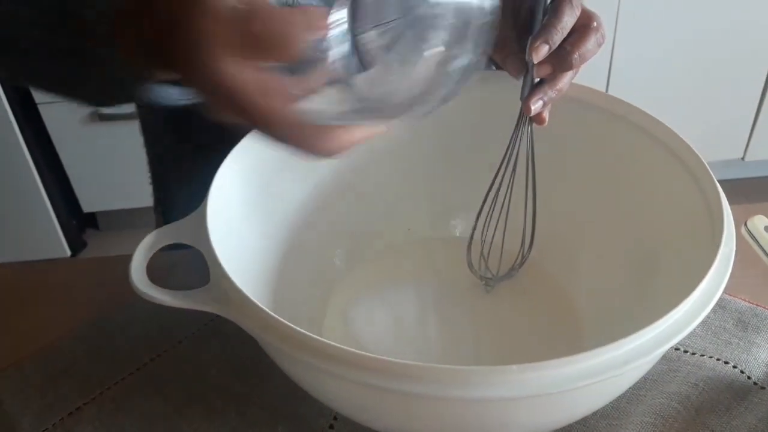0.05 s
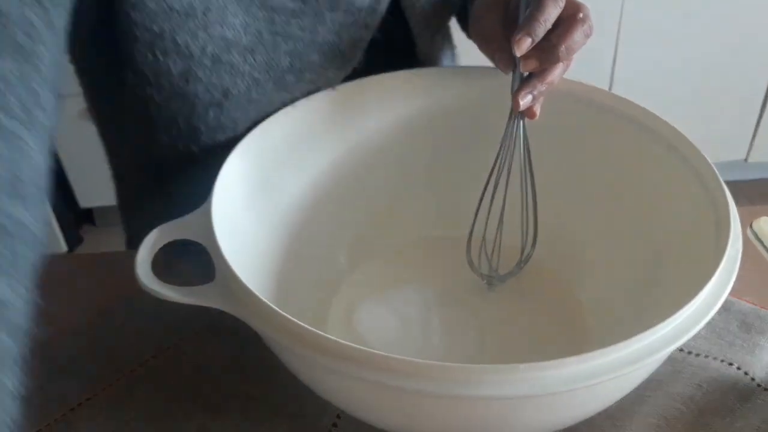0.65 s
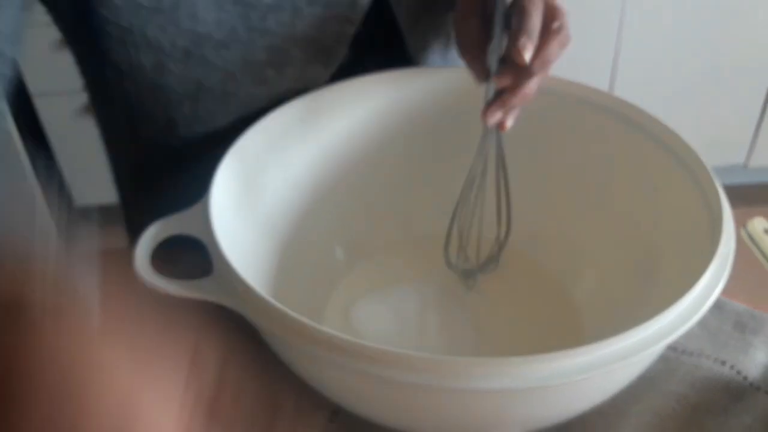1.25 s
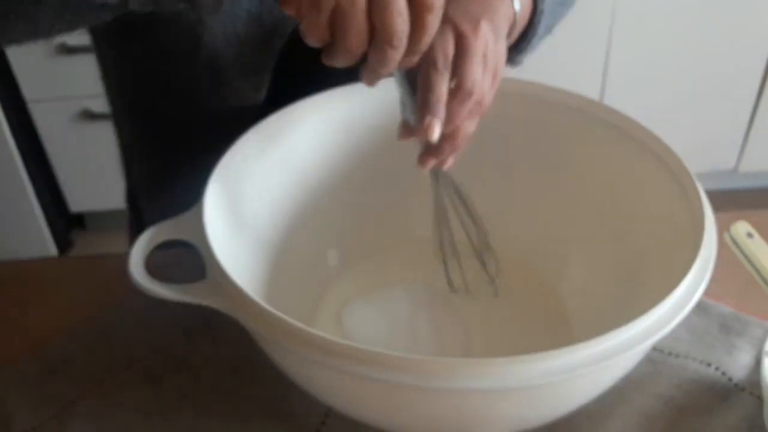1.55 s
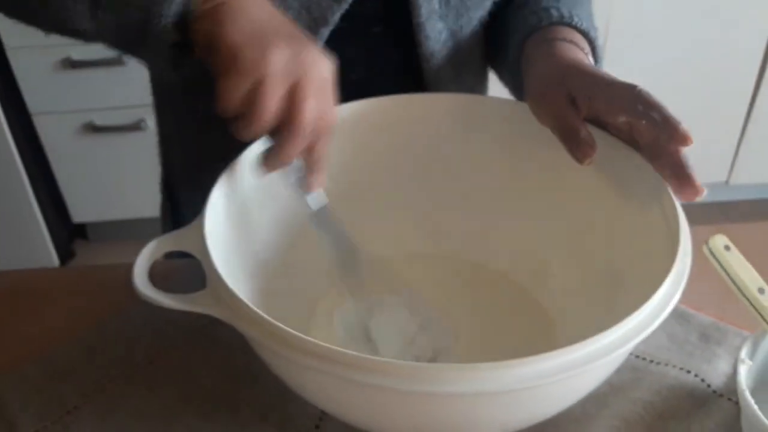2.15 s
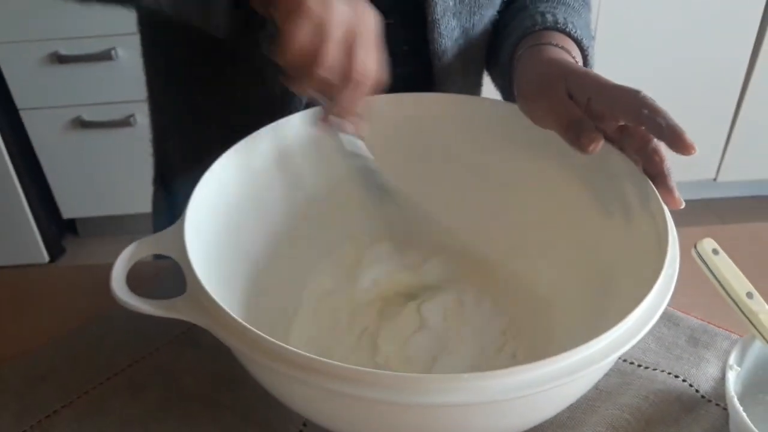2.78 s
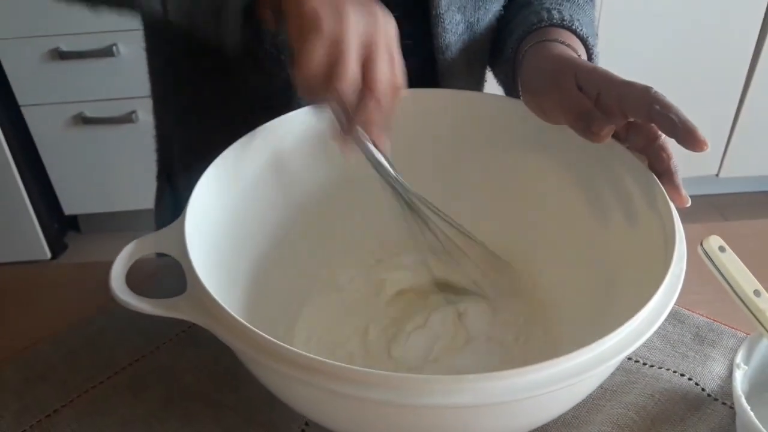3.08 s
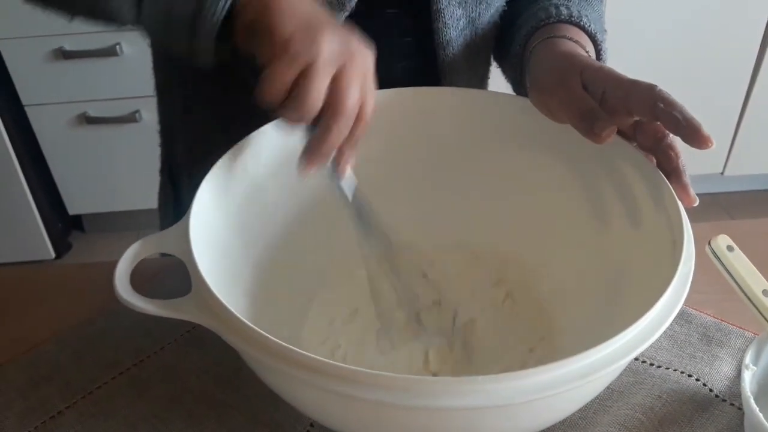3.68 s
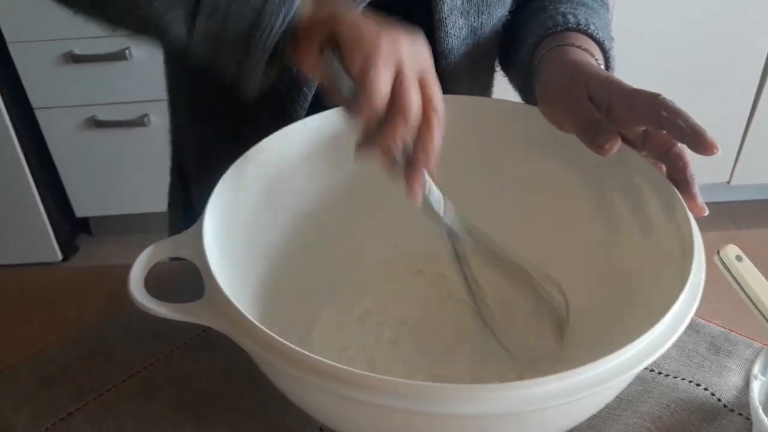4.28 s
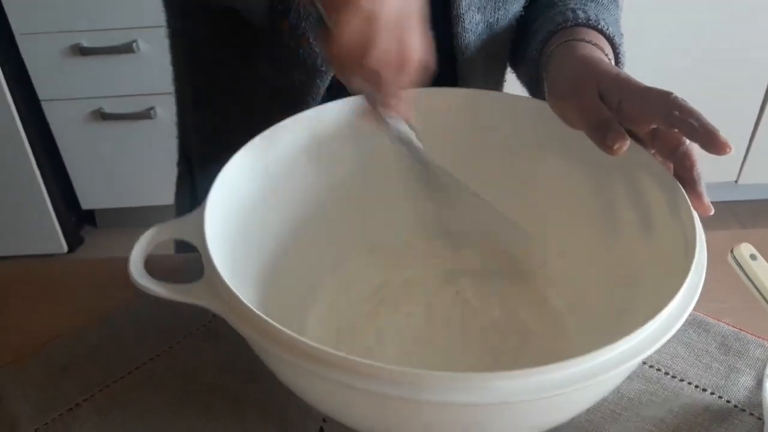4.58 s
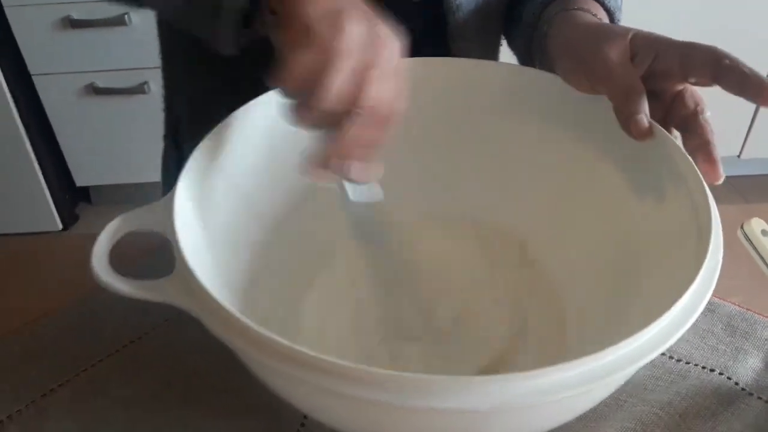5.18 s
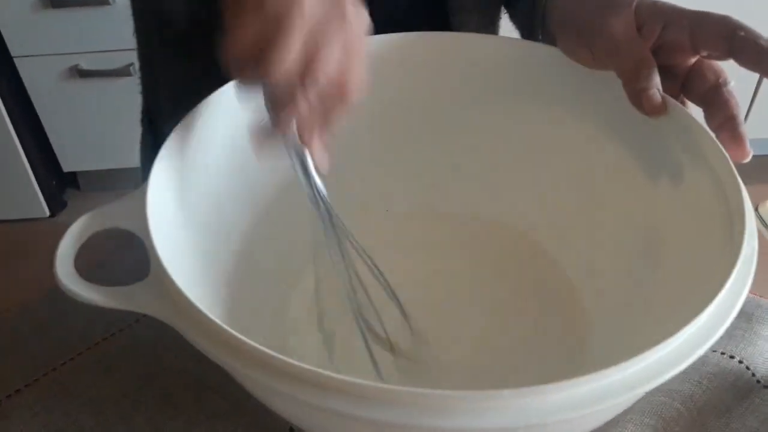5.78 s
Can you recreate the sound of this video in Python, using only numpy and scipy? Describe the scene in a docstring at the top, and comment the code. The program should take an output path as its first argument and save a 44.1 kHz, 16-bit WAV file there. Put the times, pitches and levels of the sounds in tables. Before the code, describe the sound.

Close to the microphone, a wire whisk beats runny batter in a large plastic bowl. Before it starts there is low kitchen hush, two quick dull knocks on a table, a faint rustle of wool and several small taps of the whisk. Then comes rapid, scratchy rattling with sharp irregular clacks, a soft wet slosh and the low drumming of the bowl on the table, lightly echoed by the room.

```python
"""A light tap sounds in a hushed kitchen, then a dull double knock as something is set on the table.
A sleeve brushes past, and a wire whisk taps a big plastic bowl as it changes hands.
Then the whisk beats thin batter, about eight strokes a second: the wires chatter and slap on the wall,
the plastic rings briefly, the bowl drums softly on the table, and the batter gurgles and fizzes."""
import sys
import numpy as np
from scipy import signal
from scipy.fft import rfft, irfft
from scipy.io import wavfile
from scipy.ndimage import uniform_filter1d

SR = 44100
rng = np.random.default_rng(int(sys.argv[2]) if len(sys.argv) > 2 else 0)


def persist_wave(psi):
    """Save psi, clipped to +-1, as 16-bit WAV."""
    counts = np.round(np.clip(psi, -1, 1) * 32767).astype(np.int16)
    wavfile.write(sys.argv[1], SR, np.atleast_2d(counts).T)


N = 266449


def from_db(db):
    """Turn decibels into a number to multiply by."""
    return 10 ** (np.asarray(db) / 20)


def rms_one(x):
    """Scale a sound to an average power of 1."""
    return x / np.sqrt(np.mean(x ** 2) + 1e-20)


def seconds():
    """The time of every sample."""
    return np.arange(N) / SR


def at_hz(points, hz):
    """Read between the rows of a table, giving every octave equal room."""
    known_hz, values = np.transpose(points)
    return np.interp(np.log(np.maximum(hz, 1)), np.log(known_hz), values)


def colour(x, spectrum, size=4096):
    """Turn each pitch up or down as a table of (pitch_hz, level_db) says."""
    gains = from_db(at_hz(spectrum, np.fft.rfftfreq(size, 1 / SR)))
    # minimum phase: the filter never rings before the sound arrives
    cepstrum = irfft(np.log(gains))
    cepstrum[1:size // 2] *= 2
    cepstrum[size // 2 + 1:] = 0
    return signal.oaconvolve(x, irfft(np.exp(rfft(cepstrum))))[:len(x)]


def low_cut(x, edge_hz):
    """Remove the deep bass, which small surfaces cannot give off."""
    return signal.sosfilt(signal.butter(4, edge_hz, "high", fs=SR, output="sos"), x)


def ring(clicks, hz, fade_s):
    """Each click starts a pure tone that drops by 60 dB in fade_s."""
    decay, turn = from_db(-60 / (fade_s * SR)), 2 * np.pi * hz / SR
    return signal.lfilter([0, np.sin(turn)], [1, -2 * decay * np.cos(turn), decay ** 2], clicks + 1e-18)


def push(length_s, size=24000):
    """One smooth push, then silence; the samples add up to 1."""
    force = np.sin(np.pi * np.minimum((np.arange(size) + .5) / max(length_s * SR, 1), 1))
    return force / force.sum()


def add(out, start_s, sound):
    """Mix a sound in at the given time."""
    start = max(round(start_s * SR), 0)
    out[start:start + len(sound)] += sound[:max(N - start, 0)]


def steady(x, span_s):
    """Even out loudness changes slower than span_s, keeping the finer grain."""
    span = int(span_s * SR)
    power = uniform_filter1d(uniform_filter1d(rms_one(x) ** 2, span), span)
    return x / np.std(x) / np.sqrt(np.abs(power) + 1e-4)


def random_clicks(per_s, spread_db):
    """Clicks at random moments with uneven strengths."""
    return (rng.random(N) < per_s / SR) * from_db(spread_db * np.clip(rng.standard_normal(N), -2, 2))


def follow(force, level_db, db_per_db):
    """A gain near level_db at an ordinary stroke: it grows with force and stops as the wires lift."""
    ordinary_force, lift_off_force = from_db(-16.5), from_db(-60)
    touching = force ** 2 / (force ** 2 + lift_off_force ** 2)
    return from_db(level_db) * (force / ordinary_force) ** db_per_db * touching


# the tone of the quiet room: pitch_hz, level_db
HUSH_SPECTRUM = [(25, -34), (70, -1), (140, 3), (440, -1.5), (800, -8), (1000, -4.5), (1600, -8.5),
                 (2600, -13), (4000, -15), (4700, -27.5), (5700, -34), (8000, -42.5), (12500, -31.5),
                 (16000, -34)]

def room_tone():
    """The steady hush of the kitchen, sinking a little."""
    level_db = -47.5 + np.interp(seconds(), [0, .9, 2], [1.2, -1.2, -2.5])
    return from_db(level_db) * rms_one(colour(rng.standard_normal(N), HUSH_SPECTRUM))


# how long the kitchen's echo takes to drop by 60 dB: pitch_hz, fade_s
ECHO_FADES = [(100, 1), (300, 0.61), (1000, 0.47), (3000, 0.39), (7000, 0.32), (15000, 0.36)]

def echoes(build_s, size=24000, bands=9):
    """The kitchen's answer to a click: a wash of echoes builds up, then the highs die before the lows."""
    t, hz = np.arange(size) / SR, np.fft.rfftfreq(size, 1 / SR)
    white, centres = rfft(rng.standard_normal(size)), np.geomspace(80, 16000, bands)
    tail = 0
    for centre, share in zip(centres, np.eye(bands)):
        band = irfft(white * at_hz(np.c_[centres, share], hz), size)
        tail = tail + band * from_db(-60 * t / at_hz(ECHO_FADES, centre))
    tail = tail * (1 - np.exp(-(t / build_s) ** 2))
    return tail / np.linalg.norm(tail)


# the tone of rubbing wool: pitch_hz, level_db
WOOL_SPECTRUM = [(800, -11), (2000, -3), (3800, 1.5), (5000, -11), (7000, -22.5), (10000, -21),
                 (16000, -27)]

def sleeve():
    """A woollen sleeve brushes past close by."""
    swell = np.exp(-((seconds() - 1.29) / .08) ** 2)
    return from_db(-49) * swell * rms_one(colour(rng.standard_normal(N), WOOL_SPECTRUM))


# blows on the table: start_s, strength_db, contact_s
TABLE_BLOWS = [(0.9482, -4, 0.001), (1.1044, -4.5, 0.0012)]
# the notes of the table top: pitch_hz, level_db, fade_s
TABLE_NOTES = [(136.2, -22, 0.43), (181, -22.5, 0.4), (253, 3.5, 0.012), (268, -14, 0.15),
               (400, -17.5, 0.24), (515, -18, 0.21), (566, -15.5, 0.25), (745, -18, 0.12),
               (987, -7.5, 0.066), (1230, -27, .05)]
# the tone of the room's boom: pitch_hz, level_db
BOOM_SPECTRUM = [(35, -62), (60, -31), (127, -14), (223, -7), (259, -0.5), (301, -10.5), (389, -2.5),
                 (649, -9), (700, -6.5), (864, -13.5), (975, -10), (2200, -43.5), (2860, -79), (4840, -120)]

def knocks():
    """A blunt blow thumps the table top, the hard faces tick, and the whole room booms after it."""
    out = np.zeros(N)
    for start_s, strength_db, contact_s in TABLE_BLOWS:
        force = push(contact_s)
        thump = sum(from_db(db) * ring(force, hz, fade_s) for hz, db, fade_s in TABLE_NOTES)
        boom = colour(echoes(build_s=.0018), BOOM_SPECTRUM)
        boom = from_db(15) * boom / np.linalg.norm(boom)
        tick = from_db(-35) * clack(1600, fade_s=.03, crack_db=5)
        add(out, start_s, from_db(strength_db) * (low_cut(thump, edge_hz=134) + boom + tick))
    return out


# light taps of the whisk: start_s, peak_db, pitch_hz, crack_db, cage_db
WHISK_TAPS = [(0.028, -28, 3860, 16, -18), (1.459, -32, 1545, -2, -12), (1.465, -38, 2280, 2, -12),
              (1.5996, -15, 1665, -4, -7), (1.744, -31.5, 3090, -4, -2), (1.78, -37, 3850, -4, -5),
              (1.806, -27.5, 1900, -17, -9)]
# the notes of the whisk's wire cage: pitch_hz, level_db, fade_s
CAGE_NOTES = [(976, -18, 0.24), (1710, -12, 0.11), (2500, 1, 0.02), (2620, -15, 0.054), (3500, -16, 0.08),
              (3830, -26, 0.12), (4630, -25, .06), (9800, -59, .04), (13750, -28, 0.01),
              (14400, -34, 0.087)]

def taps():
    """Lone taps on the bowl leave the wire cage free to ring."""
    out, touch = np.zeros(N), push(.00002)
    cage = sum(from_db(db) * ring(touch, hz, fade_s) for hz, db, fade_s in CAGE_NOTES)
    for start_s, peak_db, hz, crack_db, cage_db in WHISK_TAPS:
        sound = clack(hz, fade_s=.04, crack_db=crack_db) + from_db(cage_db) * cage
        add(out, start_s, from_db(peak_db) * sound / np.abs(sound).max())
    return out


# the low notes of the bowl standing on the table: pitch_hz, level_db, fade_s
BOWL_LOW_NOTES = [(84, 0.5, 0.14), (135.7, 2, 1), (175, 4.5, 0.041), (269, -8, 0.21), (417, -8.5, 0.68),
                  (511.3, 5.5, 0.19), (564, -4, 0.055), (790, -19, 0.039)]
# rocking at an ordinary stroke, freer as the hand on the rim loosens: time_s, level_db
ROCKING_LEVELS = [(2.3, -48), (3.2, -51.5), (4.5, -47.5), (5.2, -45), (6.04, -44)]

def rocking(force):
    """The strokes jostle the bowl on the table, and its low notes drum softly."""
    jolts = random_clicks(per_s=140, spread_db=-.5) * rng.choice([-1, 1], N)
    drum = sum(from_db(db) * ring(jolts, hz, fade_s) / np.sqrt(fade_s)
               for hz, db, fade_s in BOWL_LOW_NOTES)
    level_db = np.interp(seconds(), *np.transpose(ROCKING_LEVELS))
    return follow(force, level_db, db_per_db=.16) * steady(low_cut(drum, edge_hz=97), span_s=.065)


# the tone of the batter's bubbles and folds: pitch_hz, level_db
GURGLE_SPECTRUM = [(150, -4), (270, 2), (450, 8), (600, 1.5), (770, 10.5), (950, 1.5), (1200, -1)]

def gurgle(bowl_gain, per_s=110, cycles=7, rise=.12):
    """Air pockets folded into the batter ring for a few cycles, rising in pitch as they close."""
    bubbles, t = np.zeros(N), np.arange(2500) / SR
    for when, pitch, strength in rng.random((int(per_s * N / SR), 3)):
        hz = 220 + 950 * pitch
        age = t * hz / cycles
        glide = 1 + rise * np.minimum(age, 3) / 2
        bubble = np.sin(2 * np.pi * hz * t * glide) * age * np.exp(-2 * age)
        add(bubbles, when * N / SR, from_db(9.9 * strength) * np.sqrt(hz) * bubble)
    air_db = np.interp(seconds(), [2.9, 3.7, 5.2], [-5, 0, 1])  # louder as air is beaten in
    slosh = bowl_gain ** .52  # the batter keeps moving between strokes
    return from_db(-30 + air_db) * slosh * steady(colour(bubbles, GURGLE_SPECTRUM), span_s=.098)


# the tone of the fizz: pitch_hz, level_db
FIZZ_SPECTRUM = [(3000, -12), (6000, -3), (7300, -6.5), (8150, -9), (8800, -1.5), (10000, -2),
                 (11300, -5.5), (12500, -2), (15800, -3.5)]

def fizz(force, extra_db):
    """Wires tick against each other while tiny bubbles burst in the batter."""
    ticks = chatter(per_s=700, low_hz=5500, high_hz=16000, swell_s=.0014, spread_db=5.5, tones=3)
    pops = random_clicks(per_s=900, spread_db=5)
    bursts = signal.lfilter([1], [1, -np.exp(-1 / (.002 * SR))], pops + 1e-18)  # 2 ms tails
    grains = from_db(-1.5) * ticks + rms_one(bursts * rng.standard_normal(N))
    froth_db = 1.3 * (seconds() - 4)  # the fizz grows as air is beaten in
    gain = follow(force, -37.7 + froth_db + extra_db, db_per_db=1.12)
    return gain * steady(colour(grains, FIZZ_SPECTRUM), span_s=.018)


# the pitch the wires favour, set by where they touch: time_s, pitch_hz
CONTACT_PITCHES = [(2.15, 3170), (2.65, 3210), (2.8, 2720), (2.94, 3680), (3.1, 2950), (3.36, 3140),
                   (3.7, 3200), (4.01, 2950), (4.35, 3250), (4.8, 3300), (5.25, 2660), (5.65, 3100),
                   (6.04, 3180)]

def favoured_hz(times_s, fall_hz_per_s=4600):
    """The wires' favoured pitch slides down through each stroke."""
    middles = np.transpose(WHISK_STROKES)[0]
    nearest = middles[np.abs(times_s[:, None] - middles).argmin(axis=1)]
    return np.interp(times_s, *np.transpose(CONTACT_PITCHES)) - fall_hz_per_s * (times_s - nearest)


def chatter(per_s, low_hz, high_hz, swell_s, spread_db, favour_db=0, tones=1):
    """Each contact lands on another spot and rings briefly and softly at its own pitch."""
    out, t = np.zeros(N), np.arange(900) / SR
    events = int(per_s * N / SR)
    starts = rng.uniform(0, N / SR, events)
    pitches = rng.uniform(low_hz, high_hz, (events, tones))
    levels_db = spread_db * np.clip(rng.standard_normal((events, tones)), -2, 2)
    levels_db += favour_db * np.exp(-((pitches - favoured_hz(starts)[:, None]) / 380) ** 2)
    swells = swell_s * from_db(4 * rng.standard_normal((events, 1)))
    shapes = t / swells * np.exp(-t / swells) / np.sqrt(swells) * (1 - t / t[-1])
    for start_s, hz, gain, shape in zip(starts, pitches, from_db(levels_db), shapes):
        add(out, start_s, shape * (gain @ np.sin(2 * np.pi * hz[:, None] * t)))
    return rms_one(out)


# the most lasting notes of the bowl's wall: pitch_hz, level_db, fade_s
WALL_NOTES = [(1340, -33.5, 0.32), (3534, -21, 0.025)]

def wall_rattle():
    """The wet wires hit the wall and slide between hits; the wall rings on at its own pitches."""
    hits = chatter(per_s=2200, low_hz=200, high_hz=6500, swell_s=.0025, spread_db=4.4, favour_db=6.5)
    scrape = hits + from_db(-13) * rng.standard_normal(N)
    return scrape + sum(from_db(db) * rms_one(ring(scrape, hz, fade_s)) for hz, db, fade_s in WALL_NOTES)


# the tone of the plastic where the strokes begin, and where they move to: pitch_hz, level_db
FIRST_WALL_SPECTRUM = [(130, -29), (350, -28.5), (780, -17), (950, -29), (1130, -8), (1340, 0), (1680, -6),
                       (1950, -1), (2200, -7), (2550, -14.5), (4000, -58.5)]
SECOND_WALL_SPECTRUM = [(125, -21.5), (330, -22.5), (780, -16.5), (930, -15.5), (1130, -7), (1340, 1),
                        (1600, 3.5), (1780, -5), (2150, -4.5), (2550, -18), (4000, -49.5)]

def plastic(rattle):
    """The hollow voice of the wall, fuller once the strokes move to another part of the bowl."""
    moved = np.clip((seconds() - 4.15) / .083, 0, 1)
    first = rms_one(colour(rattle, FIRST_WALL_SPECTRUM))
    second = rms_one(colour(rattle, SECOND_WALL_SPECTRUM))
    return steady((1 - moved) * first + moved * second, span_s=.02)


# the tone of the struck wires: pitch_hz, level_db
WIRE_SPECTRUM = [(1200, -39.5), (1950, -4), (2250, 0), (2520, -6), (2850, -2.5), (3150, -6.5), (3520, 1),
                 (4100, -1.5), (4500, -10.5), (4800, -11.5), (5400, -19.5), (5900, -29.5), (7500, -46.5)]

def wires(rattle):
    """The bright voice of the wires as they rattle over the wall."""
    return steady(colour(rattle, WIRE_SPECTRUM), span_s=.011)


def clack(hz, fade_s, crack_db):
    """One hard hit: the struck spot swells and rings briefly under a short crack."""
    t = np.arange(24000) / SR
    spot = np.sin(2 * np.pi * hz * t) * from_db(-60 * t / fade_s) * (1 - np.exp(-t / .0007))
    burst = rng.standard_normal(len(t)) * np.exp(-t / .0054)
    crack = colour(burst, WIRE_SPECTRUM) + from_db(-25.5) * colour(burst, FIZZ_SPECTRUM)
    sound = spot / np.abs(spot).max() + from_db(crack_db) * crack / np.abs(crack).max()
    return sound / np.abs(sound).max()


# a wire slaps the wall hard: start_s, peak_db, pitch_hz
HARD_SLAPS = [(2.1704, -10, 1480), (2.2518, -11, 3330), (2.3425, -17, 3700), (2.3719, -4, 3610),
              (2.4745, -12, 1340), (2.5481, -12.5, 1317), (2.6756, -10, 1317), (3.0864, -7, 2300),
              (3.3603, -12, 1387), (3.8934, -9.5, 1358), (4.236, -7, 3140), (4.2466, -9, 3270),
              (4.5451, -5, 3690), (4.59, -6.5, 1580), (4.6173, -6, 1570), (4.745, -9.5, 1376),
              (4.805, -6, 4190), (4.9326, -6.5, 2890), (5.0914, -7.5, 1500), (5.2073, -12, 1290),
              (5.2394, -6.5, 2060), (5.2953, -3.5, 1360), (5.3597, -1, 2460), (5.456, -9.5, 1530),
              (5.5399, -6.5, 1870), (5.8297, -13, 1970), (6.0106, -7.5, 1287)]

def slaps(bowl_gain, strays_per_s=5):
    """Hard slaps stand out of the chatter; lighter ones come by chance, as strong as the stroke allows."""
    out = np.zeros(N)
    for start_s, peak_db, hz in HARD_SLAPS:
        add(out, start_s, from_db(peak_db) * clack(hz, fade_s=.034, crack_db=-5))
    for when, spot in rng.random((int(strays_per_s * N / SR), 2)):
        hz = 1360 + 364 * spot ** 2  # mostly the wall's lower notes
        hit = clack(hz, fade_s=.045, crack_db=-10)
        add(out, when * N / SR, from_db(8.5) * bowl_gain[int(when * N)] * hit)
    return out


def leaps(landing_s=2.169, lifted_s=.1, leap_s=.011, leap_db=-4):
    """The force stops as the whisk hangs before the beating, and dips as the wires leap before a slap."""
    t = seconds()
    leaping = sum((t > slap_s - leap_s) & (t < slap_s) for slap_s, _, _ in HARD_SLAPS) > 0
    lifted = (t > landing_s - lifted_s) & (t < landing_s)
    return np.abs(uniform_filter1d(from_db(leap_db * leaping) * ~lifted, size=64))


# the whisk dragging through the batter between strokes: time_s, force_db
DRAG_FORCES = [(2.15, -91), (2.33, -60), (2.45, -36), (3.2, -30), (4.1, -27.5), (4.45, -30), (5.3, -26.5),
               (6.04, -30)]
# sweeps along the wall, fizzier when they cut deep: middle_s, length_s, force_db, extra_fizz_db
WHISK_STROKES = [(1.811, 0.064, -45.5, 3), (1.93, .041, -52.5, -3), (2.178, 0.033, -22.5, 1.5),
                 (2.236, 0.071, -24.5, -3), (2.373, 0.047, -15, -2), (2.53, 0.053, -22, -5.5),
                 (2.653, 0.07, -19.5, 0.5), (2.809, 0.07, -19, -3.5), (2.942, 0.068, -18.5, 1),
                 (3.085, 0.054, -17.5, -1), (3.216, 0.064, -15, -1.5), (3.359, 0.05, -15, -2.5),
                 (3.468, .069, -18, 1), (3.578, 0.046, -16.5, -0.5), (3.683, 0.045, -15.5, -2.5),
                 (3.782, 0.057, -16.5, -2), (3.891, 0.05, -19, 1), (4.003, 0.045, -17.5, -3.5),
                 (4.113, .058, -19.5, 0), (4.232, .075, -22, 2), (4.31, 0.036, -23, 5.5),
                 (4.394, 0.037, -30.5, 10.5), (4.463, 0.045, -30.5, 10), (4.568, 0.11, -17, 1),
                 (4.689, 0.074, -17, 7), (4.755, 0.097, -17.5, -5.5), (4.893, 0.061, -22, 3),
                 (4.99, 0.062, -16.5, -1.5), (5.112, .075, -16.5, -1.5), (5.227, 0.05, -14.5, -2),
                 (5.349, 0.076, -15, -1.5), (5.419, 0.045, -16.5, 4), (5.502, 0.11, -19.5, -0.5),
                 (5.617, 0.076, -17, 1), (5.761, 0.13, -18, -1.5), (5.923, 0.056, -15, -4.5),
                 (6.02, 0.1, -23, -2)]

def strokes():
    """The wires' force on the wall and the extra fizz in dB: each sweep swells and fades over the drag."""
    t = seconds()
    power = from_db(np.interp(t, *np.transpose(DRAG_FORCES))) ** 2
    weighted_fizz = -2.5 * power  # dragging stirs up less fizz than sweeping
    for middle_s, length_s, force_db, extra_fizz_db in WHISK_STROKES:
        near = np.abs(t - middle_s) < 1.5 * length_s
        steepness = 2.6 + (.04 / length_s) ** 2  # short jabs start more abruptly
        distance = np.abs(2 * (t[near] - middle_s) / length_s)
        sweep = from_db(force_db) ** 2 * np.exp(-distance ** steepness)
        power[near] += sweep
        weighted_fizz[near] += extra_fizz_db * sweep
    return np.sqrt(power), weighted_fizz / power


def whisking():
    """One force drives bowl, wires and batter: light contact sounds hollow, hard contact bright."""
    force, extra_fizz_db = strokes()
    force = force * leaps()
    bowl_gain = follow(force, level_db=-22, db_per_db=.57)
    rattle = wall_rattle()
    beating = bowl_gain * plastic(rattle) + force * wires(rattle)
    batter = fizz(force, extra_fizz_db) + gurgle(bowl_gain)
    return beating + batter + rocking(force) + slaps(bowl_gain)


def scene():
    """The bowl close by, the kitchen around it."""
    bowl = whisking() + taps()
    kitchen = from_db(-6.5) * signal.oaconvolve(bowl, echoes(build_s=.001))[:N]
    return (bowl + kitchen + knocks() + sleeve() + room_tone())[None]


def record(dry, ceiling=.95, cutoff_hz=15850):
    """Round off the tallest peaks and cut the very highest pitches."""
    rounded = dry / (1 + np.abs(dry / ceiling) ** 6) ** (1 / 6)
    return signal.sosfilt(signal.ellip(12, .1, 70, cutoff_hz, fs=SR, output="sos"), rounded)


dry = scene()
out = record(dry)
persist_wave(out)
```